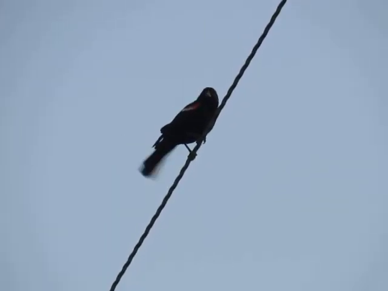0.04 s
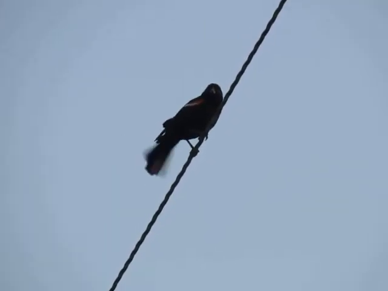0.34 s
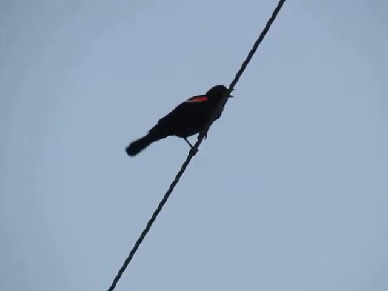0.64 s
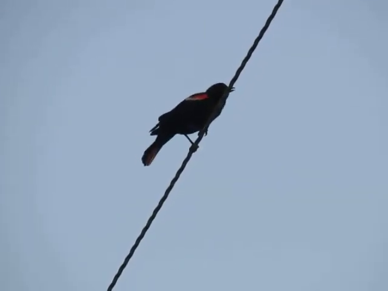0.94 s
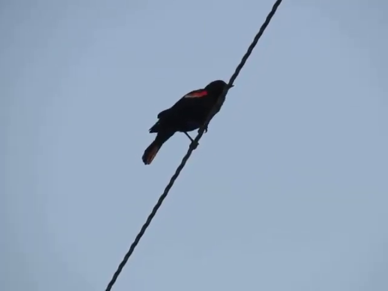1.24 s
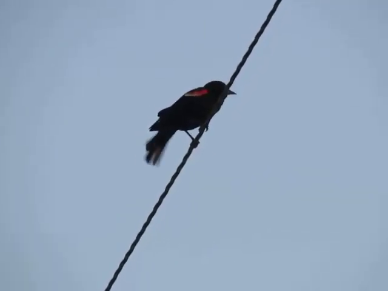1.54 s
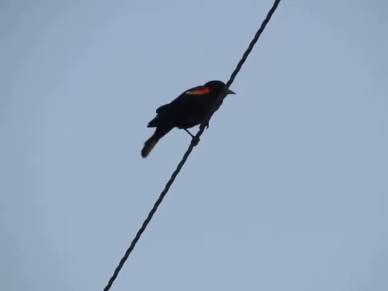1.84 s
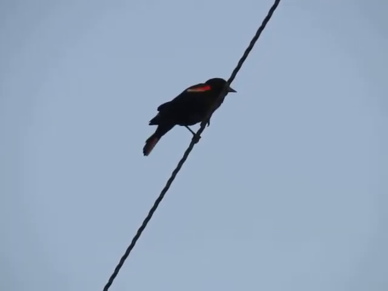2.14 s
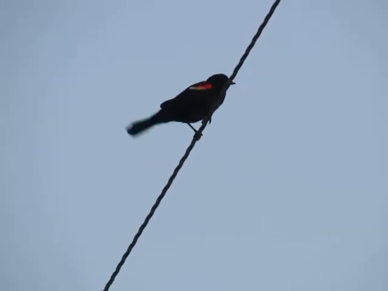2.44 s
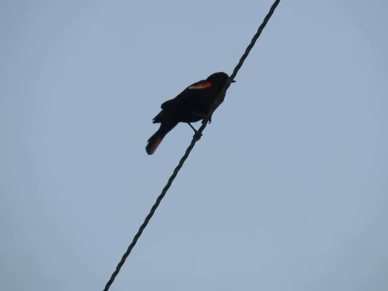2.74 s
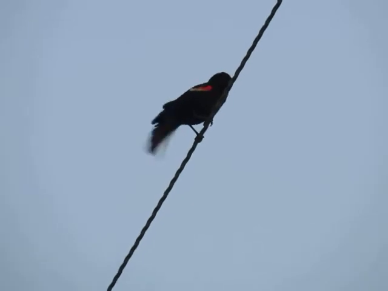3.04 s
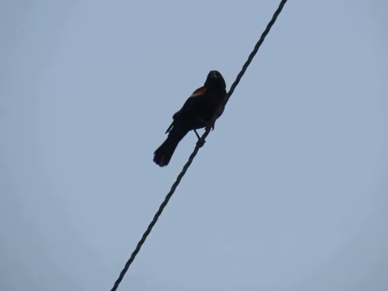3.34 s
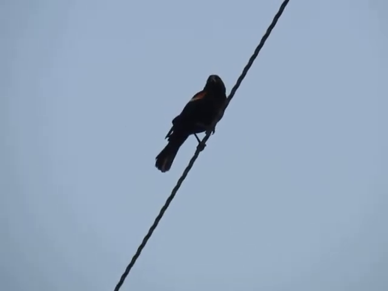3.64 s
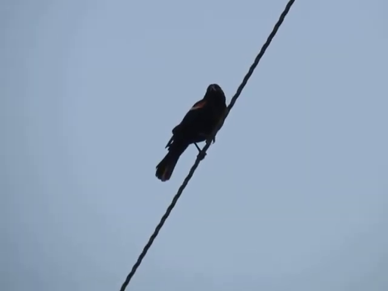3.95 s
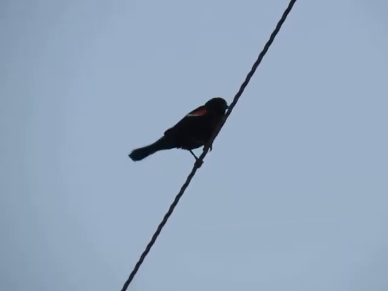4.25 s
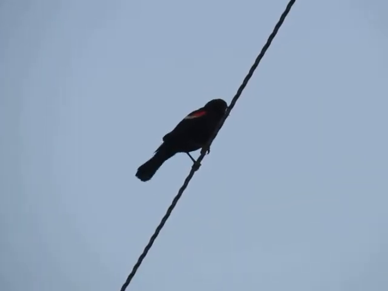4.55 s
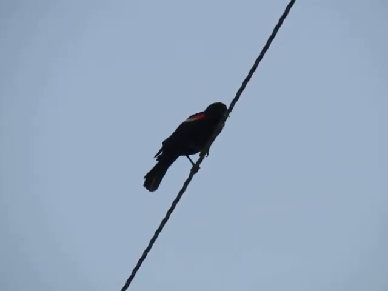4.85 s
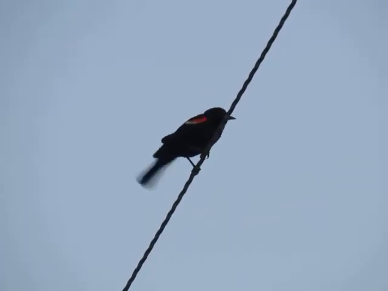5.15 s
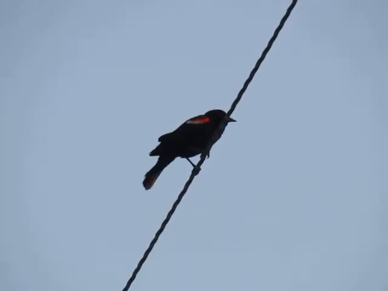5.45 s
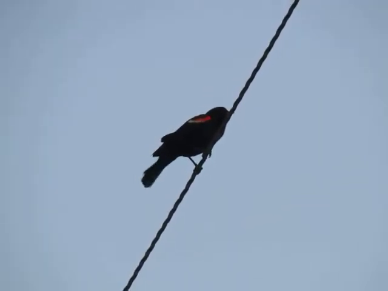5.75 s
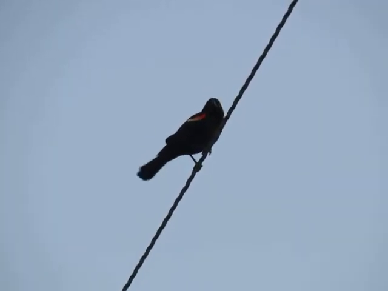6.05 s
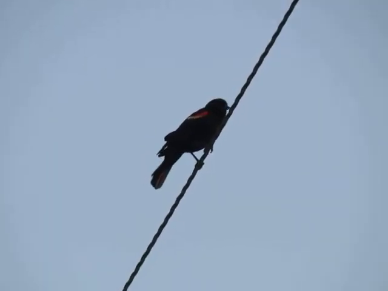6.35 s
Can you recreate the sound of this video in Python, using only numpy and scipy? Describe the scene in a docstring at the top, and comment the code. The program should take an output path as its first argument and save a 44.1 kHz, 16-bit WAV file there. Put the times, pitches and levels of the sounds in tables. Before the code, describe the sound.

A blackbird gives a harsh buzzy burst and later a falling whistle, over faint marsh birds and distant traffic.

```python
"""Distant traffic rumbles and hisses, and far marsh birds trill, whistle and chip over it.
Close by, a red-winged blackbird on a wire gives a harsh three-part burst: a slow vibration of its
syrinx modulates the tone in frequency and amplitude. Four seconds later it gives a long falling
whistle, nearly a pure tone, while a neighbour repeats a quick down-slurred phrase.
Ground, reeds and trees scatter the calls; the near bird is heard mostly by direct sound."""
import sys
import numpy as np
from scipy import signal
from scipy.fft import rfft, irfft
from scipy.io import wavfile
from scipy.ndimage import map_coordinates

SR = 44100
rng = np.random.default_rng(int(sys.argv[2]) if len(sys.argv) > 2 else 0)


def generate_wav(signal):
    """Clip the signal to [-1, 1] and save it as 16-bit WAV at the path in sys.argv[1]."""
    frames = np.transpose(np.atleast_2d(signal))
    scaled = np.clip(frames, -1, 1) * 32767
    pcm = np.round(scaled).astype(np.int16)
    wavfile.write(sys.argv[1], SR, pcm)


N = 291501
TIME = np.arange(N) / SR
FREQS = np.maximum(np.fft.rfftfreq(N, 1 / SR), 1)
LEFT_RIGHT = np.array([[1], [-1]])


def from_db(db):
    """Amplitude ratio of a level: tenfold per 20 dB."""
    return 10 ** (np.asarray(db) / 20)


def rms_one(x):
    """Normalisation to unit mean-square value."""
    return x / np.sqrt(np.mean(x ** 2) + 1e-20)


def at_hz(points):
    """Interpolation of a spectrum over logarithmic frequency."""
    hz, value = np.transpose(points)
    return np.interp(np.log(FREQS), np.log(hz), value)


def at_time(rows, t):
    """Linear interpolation of each column at the times t."""
    times, *columns = np.transpose(rows)
    return [np.interp(t, times, column) for column in columns]


def coloured(x, spectrum):
    """Linear filtering: multiplication in the frequency domain."""
    return irfft(rfft(x) * from_db(at_hz(spectrum)), N)


def drift(t, rate):
    """Band-limited fluctuation of spread about 1, through `rate` random values a second."""
    return map_coordinates(rng.standard_normal(512), [(t - t[0]) * rate], order=3, mode="wrap")


def phase_of(hz):
    """Phase is the time integral of angular frequency."""
    return 2 * np.pi * np.cumsum(hz) / SR


def envelope(t, attack_s, release_s):
    """Amplitude envelope with quarter-sine attack and release."""
    attack = np.sin(np.pi / 2 * np.clip(t / attack_s, 0, 1))
    release = np.sin(np.pi / 2 * np.clip((t[-1] - t) / release_s, 0, 1))
    return attack * release


def add(track, start_s, sound):
    """Superposition of a sound on a track, its ends tapered against clicks."""
    at = round(start_s * SR) + np.arange(len(sound))
    inside = (at >= 0) & (at < N)
    taper = signal.windows.tukey(len(sound), min(1, 128 / len(sound)))
    track[at[inside]] += (sound * taper)[inside]


# Correlation between the two microphones: f/Hz, coefficient
COHERENCE = [(30, 0.26), (100, 0.63), (300, 0.028), (1000, 0.79), (2000, 0.98), (8000, 0.18),
             (14000, 0.051)]
# Left channel minus right: f/Hz, level difference/dB
CHANNEL_DIFFERENCE = [(90, -1.5), (300, -4), (1200, 2), (3000, -0.4), (7000, -1.5), (13000, -1)]


def diffuse_noise(spectrum):
    """A diffuse field: noise from all round is only partly coherent at two microphones."""
    mid, side = rfft(rng.standard_normal((2, N)))
    coherence = at_hz(COHERENCE)
    pair = np.sqrt(1 + coherence) * mid + np.sqrt(1 - coherence) * side * LEFT_RIGHT
    gain = from_db(at_hz(spectrum) + LEFT_RIGHT * at_hz(CHANNEL_DIFFERENCE) / 2)
    return rms_one(irfft(pair * gain, N))


def outdoors(x, early_db, tail_db, tail_t60, early_t60=0.064):
    """Scattering: ground and reeds add quick echoes, far trees a tail; both decay exponentially."""
    t = TIME[:SR]
    scatter = rng.standard_normal((2, 1, SR)) + 0.55 * rng.standard_normal((2, 2, SR))
    scatter = signal.sosfilt(signal.butter(2, 6500, fs=SR, output="sos"), scatter)
    early = from_db(early_db) * rms_one(scatter[0] * from_db(-60 * t / early_t60))
    tail = from_db(tail_db) * rms_one(scatter[1] * from_db(-60 * t / tail_t60))
    echoes = signal.fftconvolve(x[None], (early + tail) / np.sqrt(SR), axes=1)[:, :N]
    return irfft(rfft(x + echoes) * from_db(LEFT_RIGHT * at_hz(CHANNEL_DIFFERENCE) / 2), N)


# Spectrum of the outdoor hiss: f/Hz, relative level/dB
AIR_SPECTRUM = [(1500, -24), (2700, -1.5), (4000, -3.5), (5500, -6), (7000, -7), (9000, -9.5), (13000, -14),
                (15500, -17)]


def air(level_db=-62.5):
    """The ambient noise floor: a faint, stationary hiss."""
    return from_db(level_db) * diffuse_noise(AIR_SPECTRUM)


# Road noise before its trims: t/s, rumble level/dB, tyre level/dB
ROAD_LEVELS = [(0, -41.5, -49), (1.4, -41, -45.5), (3, -42.5, -48.5), (4.5, -42.5, -48), (6.61, -41.5, -51)]
# Spectra of rumble and tyre roar: f/Hz, relative level/dB
RUMBLE_SPECTRUM = [(13, -48), (22, -19), (48, -9.5), (70, -9), (120, -2.5), (155, -5.5), (236, -8),
                   (325, -11), (365, -13.5), (572, -22), (700, -33), (910, -53), (1540, -120)]
TYRE_SPECTRUM = [(600, -28), (700, -20), (800, -4.5), (980, -0.5), (1600, -4.5), (2000, -16), (3500, -26),
                 (6000, -54)]


def road(rumble_trim_db=-1.0, tyre_trim_db=0.3):
    """Broadband noise of a far road: rumble and tyre roar add incoherently."""
    rumble_db, tyre_db = at_time(ROAD_LEVELS, TIME)
    rumble = from_db(rumble_db + rumble_trim_db) * diffuse_noise(RUMBLE_SPECTRUM)
    roar = from_db(tyre_db + tyre_trim_db) * diffuse_noise(TYRE_SPECTRUM)
    return rumble + roar


# Tone of the nearest engine: t/s, f/Hz
ENGINE_PITCH = [(0, 137.9), (2, 124.5), (3.6, 115), (5.4, 119.5), (6.61, 120.3)]
# Passing vehicles: loudest at t/s, half-width/s, f/Hz, peak level/dB
PASSING_DRONES = [(2.35, 2.6, 77.5, -51), (1.5, .9, 210, -50), (1.74, 0.79, 235, -48.5),
                  (2.35, 0.98, 283, -54.5), (6.11, 0.31, 236.5, -51)]


def engines(engine_db=-51.5, surge_db=8.5, surge_s=6.25, surge_width_s=0.37, pan_db=-3):
    """Wavering engine tones: the nearest surges once; passing ones follow the inverse-square law."""
    surge = np.exp(-((TIME - surge_s) / surge_width_s) ** 2)
    drones = [(at_time(ENGINE_PITCH, TIME)[0], engine_db + surge_db * surge)]
    for closest_s, width_s, hz, db in PASSING_DRONES:
        drones.append((hz, db - 10 * np.log10(1 + ((TIME - closest_s) / width_s) ** 2)))
    out = np.zeros((2, N))
    for hz, db in drones:
        phase = phase_of(hz * (1 + 0.0072 * drift(TIME, 8))) + LEFT_RIGHT * 0.39 * drift(TIME, 2.304)
        amplitude = np.sqrt(2) * from_db(db + 1.86 * drift(TIME, 7) + LEFT_RIGHT * pan_db / 2)
        out += amplitude * np.sin(phase)
    return out


# The brighter hiss of tyres: t/s, level/dB
SWISH_LEVELS = [(0, -56.5), (.4, -48.5), (.6, -60), (2.5, -58), (2.9, -59), (4, -54.5), (4.3, -61)]
# Its spectrum: f/Hz, relative level/dB
SWISH_SPECTRUM = [(1100, -21), (1800, 4), (2600, -5.5), (5000, -32.5)]


def tyre_swish():
    """Band noise under slow amplitude modulation: the tyre hiss swells and sinks."""
    return from_db(at_time(SWISH_LEVELS, TIME)[0]) * diffuse_noise(SWISH_SPECTRUM)


def far_note(length_s, start_hz, middle_hz, end_hz, db):
    """A pure tone swells and fades along a parabolic frequency glide."""
    t = np.arange(0, length_s, 1 / SR)
    glide = np.polyfit([0, .5, 1], [start_hz, middle_hz, end_hz], 2)
    swell = signal.windows.tukey(len(t), .6) * from_db(db + 1.8 * drift(t, 92))
    hz = np.polyval(glide, t / length_s) * (1 + 0.0026 * drift(t, 184))
    return np.sqrt(2) * swell * np.sin(phase_of(hz))


def far_trill(length_s, start_hz, end_hz, db, rate_hz, swing_hz, depth):
    """A gliding carrier, modulated in frequency and amplitude at one rate."""
    t = np.arange(0, length_s, 1 / SR)
    cycle = phase_of(rate_hz * (1 + 0.058 * drift(t, 60.1)))
    glide_hz = start_hz + (end_hz - start_hz) * t / length_s
    hz = glide_hz + swing_hz * (np.sin(cycle) + 0.233 * drift(t, 600))
    pulses = rms_one((1 + depth * np.cos(cycle)) ** 2)
    return np.sqrt(2) * from_db(db) * signal.windows.tukey(len(t), .6) * pulses * np.sin(phase_of(hz))


# The marsh's twitter, for its lowest-pitched calls: t/s, level/dB
TWITTER_LEVELS = [(0, -61.5), (1, -61.5), (1.8, -66), (3.7, -59), (4.4, -68.5), (6.6, -72)]


def twitter(count=220):
    """Random superposition of short, remote slurs and buzzes, the high ones fainter."""
    out = np.zeros(N)
    for k, (when, high, long, slope, buzzy) in enumerate(rng.random((count, 5))):
        start = (k + when) / count * TIME[-1]
        hz = 2200 * 3.3 ** high
        db = at_time(TWITTER_LEVELS, start)[0] - 11 * high
        call = far_trill(0.023 + 0.0617 * long, hz, hz * (.75 + .35 * slope), db,
                         rate_hz=70.4, swing_hz=450 * buzzy ** 3, depth=buzzy / 2)
        add(out, start, call)
    return out


def rising_notes(first_s=3.01, period_s=.196, count=3):
    """Periodic repetition of one upward glide by a very distant bird."""
    out = np.zeros(N)
    for k in range(count):
        note = far_note(length_s=.105, start_hz=5420, middle_hz=6270, end_hz=6400, db=-67.5)
        add(out, first_s + k * period_s, note)
    return out


# Distant pure notes: t/s, duration/s, start f/Hz, end f/Hz, level/dB
PURE_NOTES = [(0.131, 0.118, 2800, 2670, -58), (1.076, .035, 2400, 2330, -52.5),
              (1.157, 0.037, 2500, 2300, -52), (1.178, .099, 5420, 5260, -55),
              (1.295, .05, 7280, 7200, -63), (1.525, .1, 5470, 5270, -58), (1.639, 0.035, 7250, 7180, -56),
              (2.242, 0.14, 4450, 4406, -54), (2.761, .13, 4430, 4390, -58),
              (4.501, .033, 5460, 3740, -56.5), (5.131, 0.066, 2800, 2790, -55.5),
              (6.06, 0.091, 2920, 2840, -53.5), (6.228, 0.094, 2400, 2600, -56),
              (6.267, 0.11, 6630, 6630, -58)]
# An arched whistle, sung twice: t/s, level/dB
ARCHED_NOTES = [(1.307, -63.5), (3.36, -65)]


def far_whistles(bulge=0.0037):
    """Sinusoidal calls whose frequency glides bow upward in the middle."""
    out = np.zeros(N)
    for start, length_s, start_hz, end_hz, db in PURE_NOTES:
        middle_hz = (start_hz + end_hz) / 2 * (1 + bulge)
        add(out, start, far_note(length_s, start_hz, middle_hz, end_hz, db))
    for start, db in ARCHED_NOTES:
        add(out, start, far_note(length_s=.18, start_hz=4680, middle_hz=4890, end_hz=4360, db=db))
    return out


# A far bird's series of falling pips: t/s
PIP_ONSETS = [1.275, 1.603, 1.77, 1.937, 2.437, 2.603, 2.758, 2.915, 3.105, 3.316, 3.51, 3.68]
# Longer down-slurs: t/s, level/dB
LONG_PIPS = [(0.512, -55), (.745, -54.5), (.82, -55), (1.836, -50), (5.5, -55.5)]


def pips(top_hz=3416, fall_hz_per_s=18000, short_s=0.033, short_db=-57, long_s=0.073):
    """Linear chirps from one top frequency: the longer the note, the lower it ends."""
    out = np.zeros(N)
    calls = [(start, short_s, short_db) for start in PIP_ONSETS]
    calls += [(start, long_s, db) for start, db in LONG_PIPS]
    for start, length_s, db in calls:
        fall_hz = fall_hz_per_s * length_s
        add(out, start, far_note(length_s, top_hz, top_hz - fall_hz / 2, top_hz - fall_hz, db))
    return out


# Distant trills: t/s, duration/s, start f/Hz, end f/Hz, level/dB, modulation f/Hz, swing/Hz, depth
TRILL_CALLS = [(-.1, 0.71, 3470, 3446, -60, 24.5, 297, 1), (1.228, 0.24, 6030, 6060, -66.5, 52, -400, 1),
               (2.184, 0.06, 2800, 2740, -55, 45, 300, 0.1), (1.765, .17, 4900, 4950, -58, 59, 600, .05),
               (1.86, .29, 4950, 4600, -61, 61, 550, .05), (2.457, .115, 3080, 6000, -54.5, 105, 250, .8),
               (2.668, .075, 3700, 4200, -58.5, 28, 800, 1), (2.438, 0.26, 7030, 7300, -64, 110, 300, 0.3),
               (2.712, .185, 5000, 4750, -51.3, 125, 656, 0.15), (2.779, .2, 2910, 2800, -54, 50, 200, .04),
               (2.93, .6, 2850, 2800, -58.5, 32, 60, 0.5), (5.609, 0.152, 2650, 2790, -53, 62, 212, 0.1)]


def trills():
    """Modulated tones: slow modulation is heard as a trill, fast modulation as a buzz."""
    out = np.zeros(N)
    for start, *trill in TRILL_CALLS:
        add(out, start, far_trill(*trill))
    return out


def warble(start_s=1.635, length_s=.17, db=-51, foot_hz=2360, arch_hz=810, sag_hz_per_s=1900,
           swing_hz=370, vibrato_hz=45):
    """Vibrato at the top of an arched glide: the note rises, shakes and falls."""
    t = np.arange(0, length_s, 1 / SR)
    arch = np.sin(np.pi * t / t[-1]) ** 2
    shake = signal.windows.tukey(len(t), .5) ** 8 * arch * np.cos(2 * np.pi * vibrato_hz * t)
    hz = foot_hz - sag_hz_per_s * t + arch_hz * arch - swing_hz * shake
    amplitude = np.sqrt(2) * from_db(db) * envelope(t, attack_s=.035, release_s=.06)
    out = np.zeros(N)
    add(out, start_s, amplitude * np.sin(phase_of(hz)))
    return out


# Dry "chek" calls: t/s, peak level/dB
CHEK_CALLS = [(2.963, -46.5), (3.166, -42.5), (5.444, -44.5)]
# Their spectrum: f/Hz, relative level/dB
CHEK_SPECTRUM = [(1800, -23), (3700, -7), (4800, -12), (6000, -21.5), (12000, -37), (15000, -41)]


def cheks(rise_s=.0065):
    """Noise transients: a quick rise and exponential decay make a toneless cluck."""
    amplitude = np.zeros(N)
    for start, db in CHEK_CALLS:
        age = np.maximum(TIME - start, 0) / rise_s
        amplitude += from_db(db) * age * np.exp(1 - age)
    return amplitude * rms_one(coloured(rng.standard_normal(N), CHEK_SPECTRUM))


def slur(length_s=0.076, top_hz=6040, end_hz=3054, fall_s=.037, attack_s=0.02, fade_db_per_s=230):
    """A downward chirp that levels out as its amplitude decays exponentially."""
    t = np.arange(0, length_s, 1 / SR)
    hz = end_hz + (top_hz - end_hz) * np.exp(-(t / fall_s) ** 1.8)
    decay = from_db(-fade_db_per_s * np.maximum(t - attack_s, 0))
    amplitude = np.sqrt(2) * decay * envelope(t, attack_s, release_s=.005) ** 0.96
    return amplitude * np.sin(phase_of(hz * (1 + 0.019 * drift(t, 495))))


def tick(length_s=0.018, start_hz=5730, fall_hz_per_s=55000, rate_hz=140, swing_hz=700, gain_db=-5.5):
    """A few cycles of deep modulation turn a steep chirp into a buzzy tick."""
    t = np.arange(0, length_s, 1 / SR)
    cycle = 2 * np.pi * rate_hz * t
    hz = start_hz - fall_hz_per_s * t - swing_hz * np.sin(cycle)
    amplitude = from_db(gain_db) * envelope(t, attack_s=.008, release_s=0.0087)
    return amplitude * (1 + np.cos(cycle)) * np.sin(phase_of(hz))


# The neighbour's two phrases before its run: t/s, level/dB
OPENING_PHRASES = [(4.11, -53), (4.251, -51.5)]


def neighbour(run_s=4.5834, period_s=.13434, count=11, peak_s=4.75, peak_db=-48.5, fade_db_per_s2=4):
    """Slur and tick, twice, then in a periodic run under a Gaussian envelope that peaks early."""
    out = np.zeros(N)
    starts = run_s + period_s * np.arange(count)
    levels_db = peak_db - fade_db_per_s2 * (starts - peak_s) ** 2
    for start, db in [*OPENING_PHRASES, *zip(starts, levels_db)]:
        add(out, start, from_db(db) * slur())
        add(out, start + .082, from_db(db) * tick())
    return out


def harmonic_tone(t, hz, overtones_db, third_db, fourth_db, waver, flutter_db):
    """A harmonic series on a wavering fundamental; third and fourth are relative to the second."""
    phase = phase_of(hz * (1 + waver * drift(t, 152)))
    upper = from_db(third_db) * np.sin(3 * phase) + from_db(fourth_db) * np.sin(4 * phase)
    overtones = np.sin(2 * phase) + upper * (4 * hz < SR / 2)
    flutter = from_db(flutter_db * drift(t, 62.7))
    return np.sqrt(2) * flutter * (np.sin(phase) + from_db(overtones_db) * overtones)


def peep(length_s=0.12, db=-42.8, fade_db_per_s=58, top_hz=4580, sag_hz_per_s=1900,
         scoop_hz=520, scoop_s=.01):
    """A harmonic tone scoops up, sags and turns pure as its overtones decay."""
    t = np.arange(0, length_s, 1 / SR)
    hz = top_hz - sag_hz_per_s * t - scoop_hz * np.exp(-(t / scoop_s) ** 2)
    level_db = db - fade_db_per_s * (t - t.mean())
    overtones_db = -12 - 20 * (t / t[-1]) ** 2
    tone = harmonic_tone(t, hz, overtones_db, third_db=-6, fourth_db=-25, waver=.004, flutter_db=1.2)
    return from_db(level_db) * envelope(t, attack_s=0.02, release_s=0.023) * tone


def chip(length_s=0.01, top_hz=6700, end_hz=5750, db=-49.5):
    """An onset transient: a bright downward chirp as the bill opens."""
    t = np.arange(0, length_s, 1 / SR)
    hz = np.linspace(top_hz, end_hz, len(t))
    tone = harmonic_tone(t, hz, overtones_db=-7, third_db=-40, fourth_db=-40, waver=.01, flutter_db=.5)
    return from_db(db) * np.hanning(len(t)) * tone


def falling_whistle(length_s=0.392, db=-37.4, base_hz=3529, sag_hz_per_s=1126, glide_hz=556,
                    glide_s=.0234, build_s=0.056, swell_db=2, first_swell_s=.052, swell_period_s=.128):
    """Frequency relaxes exponentially onto a slow fall while the amplitude swells three times."""
    t = np.arange(0, length_s, 1 / SR)
    hz = base_hz - sag_hz_per_s * t + glide_hz * np.exp(-t / glide_s)
    swells_db = swell_db * np.cos(2 * np.pi * (t - first_swell_s) / swell_period_s)
    onset_db = -6 * np.maximum(1 - t / build_s, 0)
    overtones_db = -21 - 60 * abs(t - .1)  # brightest early on, then ever purer
    tone = harmonic_tone(t, hz, overtones_db, third_db=-14, fourth_db=-17, waver=0.0018, flutter_db=1.2)
    return from_db(db + swells_db + onset_db) * envelope(t, attack_s=0.0068, release_s=0.059) * tone


def buzz(start_s, length_s, attack_s, release_s, start_hz, end_hz, glide_power, db, rise_db, rate_hz,
         jitter, swing_hz, depth, lag_rad, roughness, overtones_db, third_db, noise_db):
    """Modulation: a slow vibration of the syrinx swings the tone's pitch and chokes it once a cycle."""
    t = np.arange(0, length_s, 1 / SR)
    along = t / t[-1]
    hz = end_hz + (start_hz - end_hz) * (1 - along) ** glide_power
    # The swing is widest before mid-syllable; the roughness halves towards the end.
    deviation_hz = swing_hz * (0.34 + 0.78 * np.sin(np.pi * along ** 0.65) ** 2)
    cycle = phase_of(rate_hz * (1 + jitter * drift(t, 152)))
    rough_hz = roughness * hz * (1 - .5 * along) * drift(t, 1200)
    phase = phase_of(hz + deviation_hz * np.sin(cycle) + rough_hz)
    amplitude = from_db(db + rise_db * (along - .5)) * envelope(t, attack_s, release_s)
    overtones = np.sin(2 * phase) + from_db(third_db) * np.sin(3 * phase) * (3 * hz < SR / 2.5)
    noise = from_db(noise_db) * rng.standard_normal(len(t))
    harshness = from_db(db + overtones_db) * envelope(t, .01, release_s) * (overtones + noise)
    pulses = rms_one(1 + depth * np.cos(cycle - lag_rad))
    out = np.zeros(N)
    add(out, start_s, np.sqrt(2) * pulses * (amplitude * np.sin(phase) + harshness))
    return out


# Response of throat and open bill during the burst: f/Hz, gain/dB
VOCAL_TRACT = [(5900, 0), (6800, -4), (7700, 0.5), (8300, 4), (9100, -2.5), (13600, -2.5), (15500, -9)]


def blackbird():
    """Source and filter: rasp and rattle pass through the throat; a peep follows, later the whistle."""
    rasp = buzz(start_s=.512, length_s=0.2515, attack_s=0.043, release_s=0.027,
                start_hz=3930, end_hz=3890, glide_power=1, db=-40.3, rise_db=4,
                rate_hz=229, jitter=.03, swing_hz=640, depth=.5, lag_rad=.2,
                roughness=.042, overtones_db=-18.5, third_db=-13, noise_db=-3)
    # The other side of the syrinx squeaks as the rasp starts.
    squeak = buzz(start_s=.518, length_s=.11, attack_s=0.025, release_s=0.046,
                  start_hz=7700, end_hz=5450, glide_power=1.5, db=-54, rise_db=-8,
                  rate_hz=237, jitter=0.025, swing_hz=500, depth=1, lag_rad=4.1,
                  roughness=0.028, overtones_db=-7, third_db=-20, noise_db=-12)
    rattle = buzz(start_s=0.772, length_s=0.079, attack_s=0.04, release_s=.022,
                  start_hz=6170, end_hz=5350, glide_power=1, db=-39.5, rise_db=-3,
                  rate_hz=146, jitter=.02, swing_hz=503, depth=.85, lag_rad=3.3,
                  roughness=.036, overtones_db=-17, third_db=-22, noise_db=1)
    out = coloured(rasp + squeak + rattle, VOCAL_TRACT)
    add(out, .848, peep())
    add(out, 4.596, chip())
    add(out, 4.628, falling_whistle())
    return out


def scene():
    """Superposition of traffic and four groups of birds, each with its direct-to-reverberant ratio."""
    near = outdoors(blackbird(), early_db=-16, tail_db=-18, tail_t60=0.87)
    middle = outdoors(neighbour(), early_db=-2, tail_db=-5.5, tail_t60=0.27)
    marsh_birds = far_whistles() + pips() + trills() + warble() + cheks()
    far = outdoors(marsh_birds, early_db=-15, tail_db=-11, tail_t60=.8)
    furthest = outdoors(twitter() + rising_notes(), early_db=-4, tail_db=-1, tail_t60=.7)
    return road() + engines() + tyre_swish() + air() + furthest + far + middle + near


def record(dry, cutoff_hz=15700):
    """Band limiting: a steep low-pass filter removes the highest treble."""
    return irfft(rfft(dry) / np.sqrt(1 + (FREQS / cutoff_hz) ** 300), N)


dry = scene()
out = record(dry)
generate_wav(out)
```